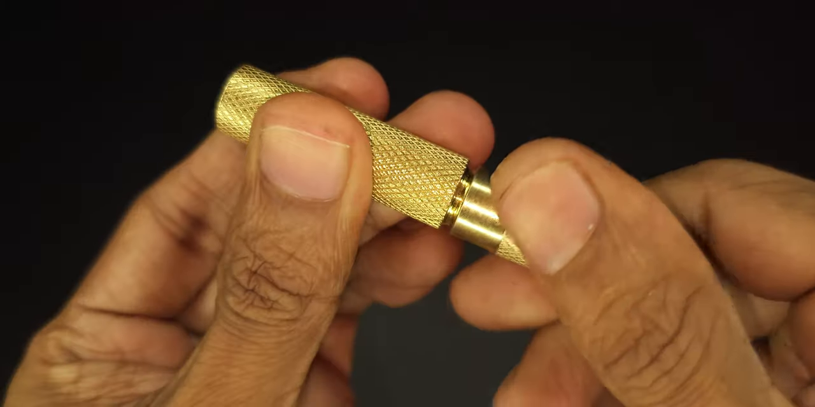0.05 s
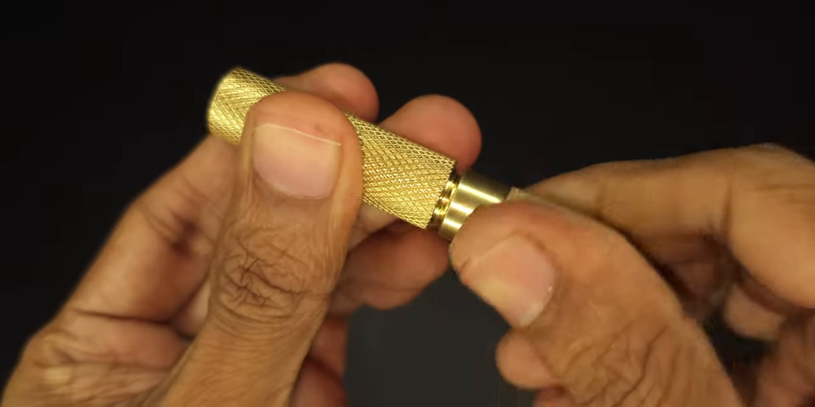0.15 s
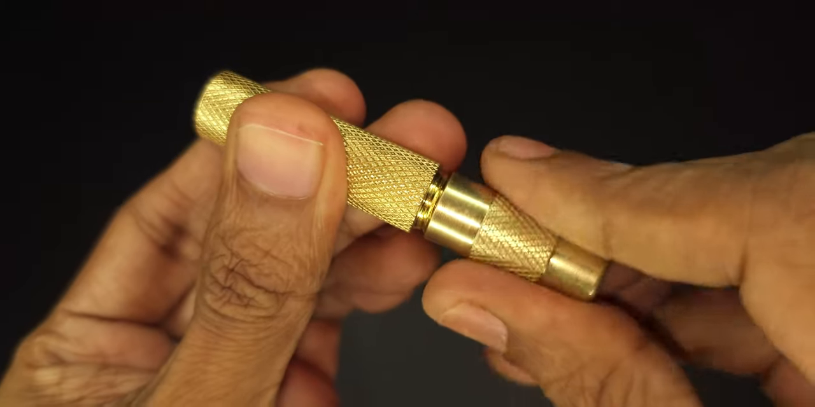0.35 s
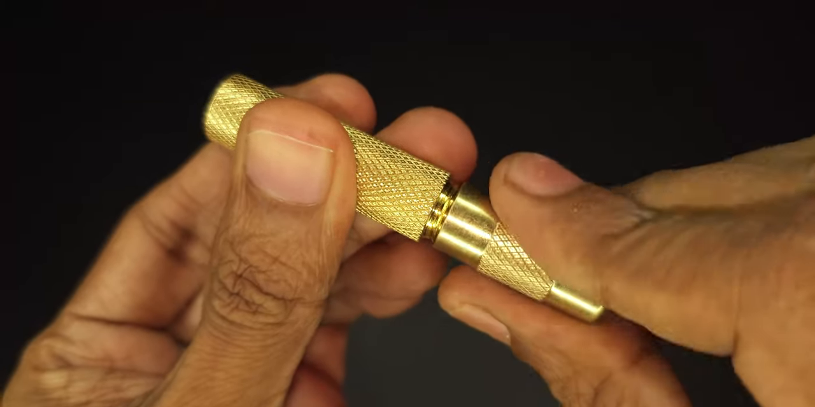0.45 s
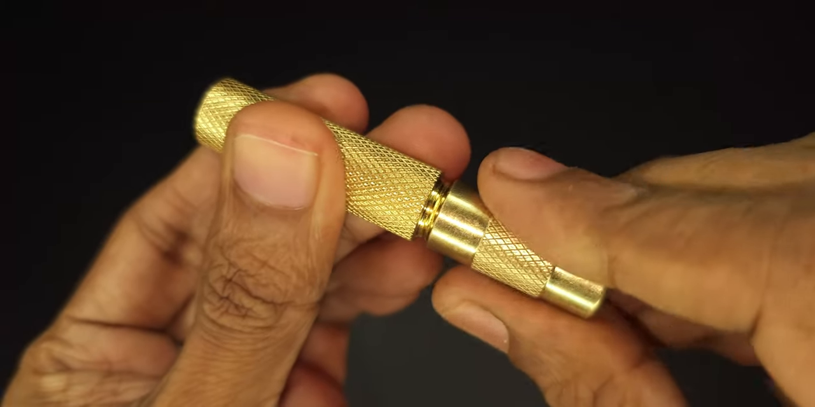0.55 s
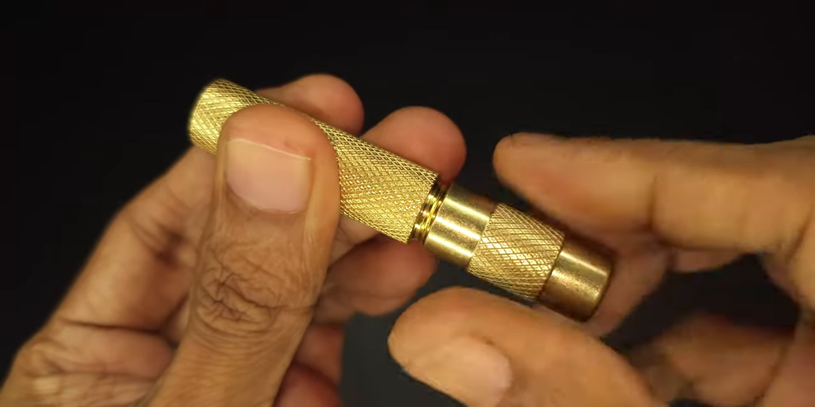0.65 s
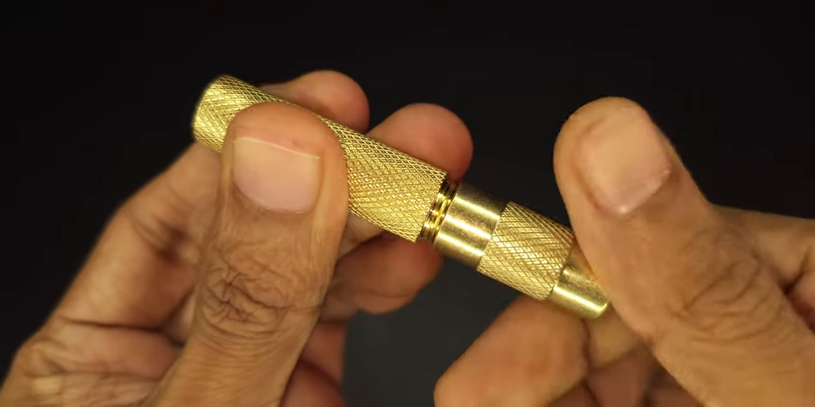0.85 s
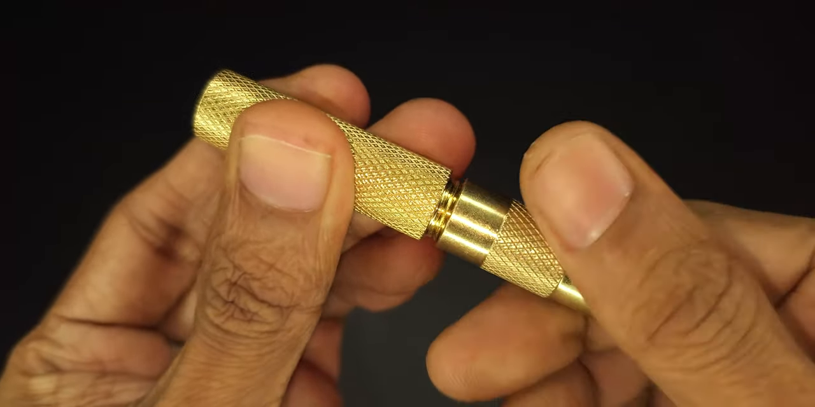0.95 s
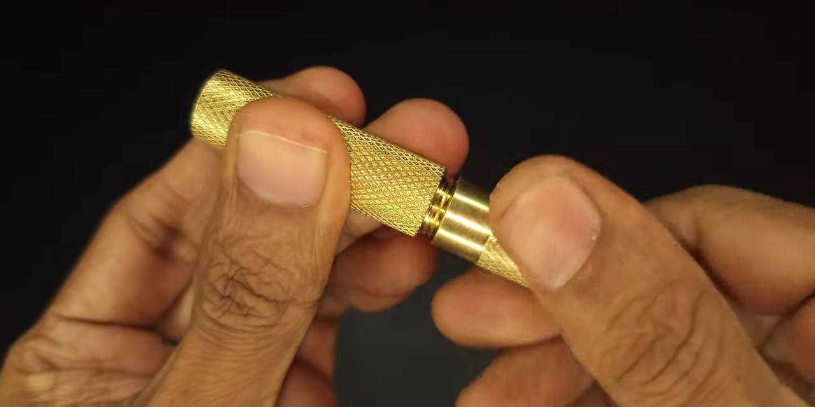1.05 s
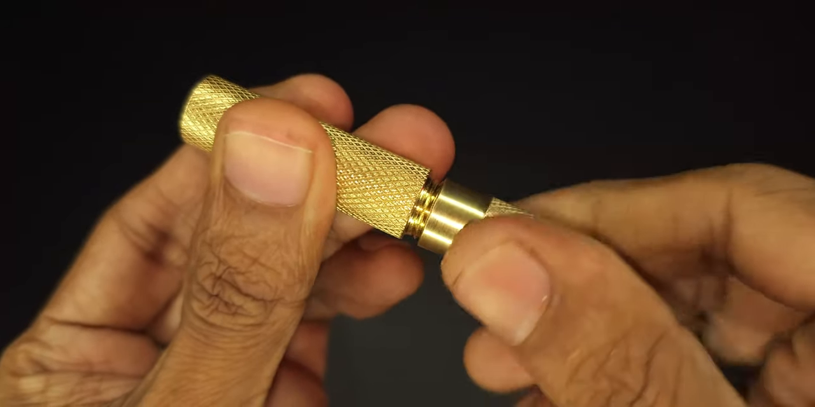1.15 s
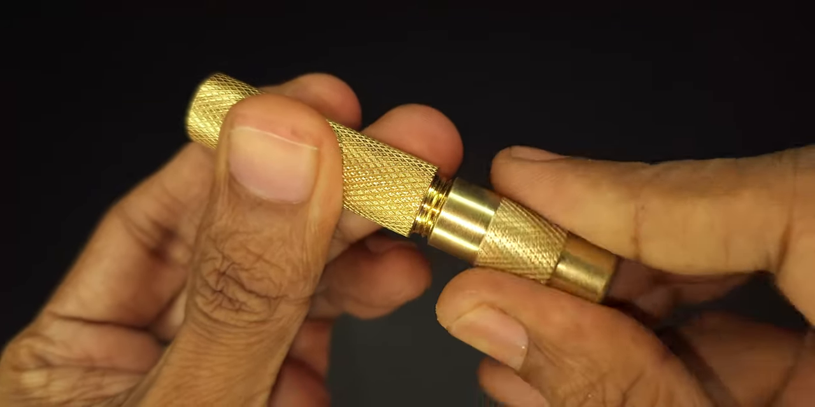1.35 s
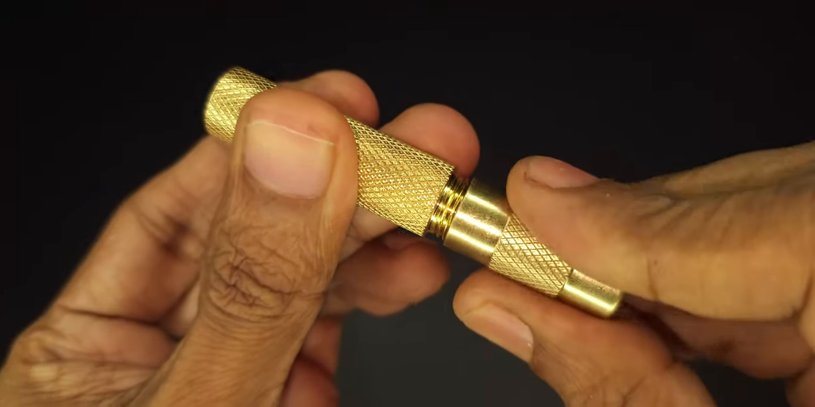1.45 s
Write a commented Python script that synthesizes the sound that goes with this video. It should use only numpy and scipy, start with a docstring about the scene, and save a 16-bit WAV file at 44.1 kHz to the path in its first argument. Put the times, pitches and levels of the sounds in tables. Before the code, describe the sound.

Close to the microphone in a quiet room, a small brass tool's loose thread catches and slips in light, irregular clicks as it is unscrewed. Two short runs, with soft rubbing and faint finger knocks, are separated by a pause.

```python
"""Short gritty clicks, close by in a quiet room: fingers unscrew the knurled brass collar of a hand tool.
In two twists, with a pause to regrip, the loose thread catches and slips; each slip is a burst of tiny
impacts. Sliding friction rubs softly between the clicks, and stick-slip squeaks where brass grips brass.
These contacts excite the hand-damped modes of the tool, and the fingers knock softly on its barrel.
A short reverberation follows, over faint rumble, hiss and hum."""
import sys
import numpy as np
from scipy import signal
from scipy.fft import rfft, irfft
from scipy.io import wavfile
from scipy.ndimage import uniform_filter1d

SR = 44100
rng = np.random.default_rng(int(sys.argv[2]) if len(sys.argv) > 2 else 0)


def generate_wav(sig):
    """Save sig (samples, or channels by samples) to the path in sys.argv[1] as 16-bit PCM at SR."""
    pcm = np.round(np.clip(np.atleast_2d(sig).T, -1, 1) * 32767).astype(np.int16)
    wavfile.write(sys.argv[1], SR, pcm)


N = 66150
FFT_SIZE = 2 ** 17
TIME = np.arange(N) / SR
FREQS = np.arange(FFT_SIZE // 2 + 1) * SR / FFT_SIZE


def clicks():
    """Impact excitation: each slip is a fast-decaying burst of grit with its own broad resonance."""
    # slips of the thread: t/s, relative bass, middle and treble level/dB, decay time constant/s,
    # resonance f/Hz, left-right/dB
    slips = [ (.0211, -44, -41, -41, .006, 5400, 6), (.052, -50, -44, -51, .005, 3900, 8),
             (.0957, -53, -48, -52, .007, 4100, 4), (.1037, -49, -50, -46, .0035, 4000, 6),
             (.1402, -46, -36, -39, .0075, 7600, 5), (.1728, -55, -49, -58, .005, 3700, 10),
             (.2244, -37, -32, -30, .002, 5450, 5), (.2291, -53, -33, -27, .003, 5700, 5),
             (.2874, -53, -45, -45, .006, 5500, 5), (.2995, -41, -33, -37, .007, 7500, 5),
             (.3361, -47, -35, -36, .004, 6550, 13), (.3525, -39, -34, -34, .004, 5400, 8),
             (.3785, -50, -50, -49, .005, 5280, 10), (.4208, -42, -40, -39, .0045, 3700, 9),
             (.6247, -68, -61, -58, .0037, 4800, 7), (.9952, -47.5, -45.5, -46.5, .0055, 8100, 9),
             (1.0397, -53, -45.5, -42, .0035, 3700, 4), (1.0574, -54, -53, -57, .005, 8250, 7),
             (1.0995, -46, -39, -38.5, .003, 3730, 7), (1.1168, -42, -35, -32.5, .003, 8700, 7),
             (1.1523, -50, -39, -44, .0045, 4050, 7), (1.1629, -61, -58, -46, .0044, 5500, 0),
             (1.1802, -55, -54, -49, .003, 4040, 7), (1.2212, -48, -41, -33, .003, 8550, 7),
             (1.2515, -46, -41, -38, .0058, 7100, 7), (1.2883, -53, -47, -45, .005, 6900, 8),
             (1.2922, -42, -36, -34, .004, 6900, 7), (1.3289, -49, -34.5, -37, .003, 6900, 7),
             (1.3445, -52, -46, -44, .005, 6570, 10), (1.3536, -51, -44, -50, .007, 6350, 9),
             (1.3753, -45, -38, -35, .004, 7750, 7), (1.4095, -47, -42, -42, .0045, 5300, 8),
             (1.4139, -55, -40, -39, .0026, 5250, 8), (1.4492, -46, -38, -33, .004, 4630, 6)]
    rise_s, hold_s = .0012, .0014
    bass_edge_hz, treble_edge_hz, band_trim_db = 2800, 8000, np.array([1, -4, 1])
    ping_db, ping_width_hz = -3, 450
    bass = 1 / np.sqrt(1 + (FREQS / bass_edge_hz) ** 12)
    treble = np.sqrt(1 - 1 / (1 + (FREQS / treble_edge_hz) ** 12))
    middle = np.sqrt(np.maximum(1 - bass ** 2 - treble ** 2, 0))
    forces, pings, grains = np.zeros((3, 2, N)), np.zeros((2, N)), grit()
    radius = np.exp(-np.pi * ping_width_hz / SR)
    for t, bass_db, middle_db, treble_db, decay_s, hz, pan_db in slips:
        span = slice(int(t * SR), int(t * SR) + SR // 10)
        age = TIME[span] - TIME[span][0]
        decay = np.exp(-np.maximum(age - hold_s, 0) / decay_s)
        burst = pan(pan_db) * np.minimum(age / rise_s, 1) * decay
        band_gains = from_db(band_trim_db + [bass_db, middle_db, treble_db])
        forces[:, :, span] += band_gains[:, None, None] * burst
        drive = from_db(middle_db + ping_db) * np.sqrt((1 - radius ** 2) / 2) * burst * grains[:, span]
        pings[:, span] += resonator(drive, hz, radius)
    colour, bands = contact_colour(), (bass, middle, treble)
    return pings + sum(shape(force * grit(), colour * band) for force, band in zip(forces, bands))


def grit():
    """Shot noise: dense tiny impacts of uneven size but steady power, heard slightly later on the right."""
    # likeness of the two sides: f/Hz, correlation
    likeness = [(100, 0.63), (600, .75), (1500, 0.563), (5000, 0.69), (15000, 0.13)]
    impacts_per_s, size_spread_db, levelling_s, right_lag_s = 6800, 1, .0015, .00014
    sizes = from_db(size_spread_db * np.minimum(rng.exponential(1, (2, N)), 4))
    signs = rng.choice([-1, 1], (2, N))
    grains = sizes * signs * (rng.random((2, N)) < impacts_per_s / SR)
    grains /= np.sqrt(uniform_filter1d(grains ** 2, size=int(levelling_s * SR)) + 1e-2)
    stereo = spread(grains, at_hz(likeness, FREQS))
    delay = np.exp(-2j * np.pi * FREQS * np.array([[0], [right_lag_s]]))
    return rms_one(filtered(stereo, delay))


def contact_colour():
    """Frequency response of brass on brass, as radiated to left and right."""
    # contact spectrum: f/Hz, relative spectral level/dB
    spectrum = [(88, -27), (150, -14), (854, -8.5), (1100, -11), (1310, -2), (1830, -4.5), (2020, 0.5),
                (2650, -8.5), (3220, -1.5), (3770, 3), (4320, -1.5), (5360, 3.5), (5910, -6), (6640, -1),
                (10600, -6), (11500, 0.5), (12400, -10), (15100, 2.5), (16000, -10.5)]
    # balance of the tool's sound: f/Hz, left-right/dB
    balance = [(100, 2), (450, 1), (1200, -0.5), (3300, -0.5), (5500, 12.5), (9000, 0), (15000, -6)]
    return from_db(at_hz(spectrum, FREQS)) * pan(at_hz(balance, FREQS)) * low_cut(hz=90)


def squeaks():
    """Stick-slip oscillation: brief tones of three harmonics with a gliding, unsteady pitch."""
    # squeaks: peak t/s, rise/s, fall/s, first f/Hz, last f/Hz, level/dB,
    # relative level/dB of the second and third harmonics
    tones = [(0.228, .0015, 0.004, 5390, 5400, -22.5, -3.5, -33),
             (.2311, 0.000518, 0.0016, 5530, 5387, -12, -0.5, -7),
             (.3379, 0.0012, 0.0011, 6870, 6550, -19, -31, -34),
             (0.3421, .002, 0.0019, 5265, 5350, -25.5, -19, -7),
             (1.333, 0.001, 0.0058, 6850, 6800, -37, -10, -48),
             (1.349, 0.0022, .007, 7300, 6140, -34, -26, -42.5)]
    # balance of each harmonic: left-right/dB
    balance = [12, -2.5, 8.5]
    wander_share, flutter_db, wander_hz = .074, 1.66, 1479
    side_phase = np.array([[0], [np.pi / 2]])
    out = np.zeros((2, N))
    for t, rise_s, fall_s, first_hz, last_hz, db, second_db, third_db in tones:
        age = TIME - t
        swell = np.exp(-np.minimum(np.where(age < 0, (age / rise_s) ** 2, age / fall_s), 20))
        glide = np.interp(age, [-rise_s, fall_s], [first_hz, last_hz])
        hz = glide * (1 + wander_share * drift(wander_hz))
        phase = 2 * np.pi * np.cumsum(hz) / SR
        offsets = rng.uniform(0, 2 * np.pi, 3)
        for k, harmonic_db in enumerate((0, second_db, third_db)):
            gain = from_db(db + harmonic_db + flutter_db * drift(wander_hz)) * pan(balance[k])
            out += gain * swell * np.sin((k + 1) * phase + offsets[k] + side_phase)
    return out


def rubbing():
    """Sliding friction: the turning thread grinds softly, fluttering under uneven pressure."""
    # course of the friction noise: t/s, level/dB
    course = [(0, -72), (.04, -58), (.12, -62.5), (.2, -53), (.29, -54.5), (.37, -51), (.41, -61.5),
              (.45, -58), (.49, -78.5), (.96, -75), (1.01, -67.5), (1.09, -62.5), (1.15, -52), (1.2, -62.5),
              (1.28, -56.5), (1.35, -48.5), (1.43, -59), (1.5, -70)]
    flutter_db = 1.5
    level_db = np.interp(TIME, *np.transpose(course)) + flutter_db * drift(hz=121)
    return shape(grit() * from_db(level_db) * pan(db=-2), contact_colour())


def tool_ring(contacts):
    """Modal resonance: the brass body rings briefly; the shifting grip favours one mode, then another."""
    # hand-damped modes: f/Hz, drive level/dB, T60/s
    tool_modes = [(1328, -55, 0.055), (2048, -54, 0.046), (3664, -40, 0.078), (3990, -41, 0.059),
                  (4350, -39, .06), (4677, -44.5, .06), (5420, -44.5, 0.021), (5950, -45.5, .04),
                  (6310, -41, 0.029), (10360, -45, 0.044), (11380, -45, .04)]
    swing_db, grip_change_hz = 4, 26.8
    out = 0
    for hz, db, t60 in tool_modes:
        drive = contacts * from_db(db + swing_db * drift(grip_change_hz))
        out = out + .5 * resonator(drive, hz, radius=from_db(-60 / (t60 * SR)))
    return out


def finger_bumps():
    """Damped oscillation: fingers knock on the barrel and quickly absorb its soft, hollow note."""
    # knocks: t/s, f/Hz, peak level/dB
    knocks = [(.070, 625, -54), (.174, 444, -52), (0.179, 126, -53), (.229, 87, -54), (.368, 87, -62),
              (.381, 653, -54.5), (.424, 224, -54.5), (.996, 80, -57), (1.058, 590, -54), (1.123, 673, -53),
              (1.182, 500, -60.5), (1.222, 500, -54), (1.256, 477, -52), (1.294, 476, -52.5),
              (1.378, 273, -55.5)]
    rise_s = .0019
    out = np.zeros(N)
    for t, hz, db in knocks:
        age = np.maximum(TIME - t, 0)
        scaled_age = np.minimum(age / rise_s, 40)
        swell = np.sqrt(scaled_age) * np.exp((1 - scaled_age) / 2)
        out += from_db(db) * swell * np.sin(2 * np.pi * hz * age)
    return out * pan(db=9)


def reverberation(direct):
    """Diffuse reflection: a short, exponentially decaying tail, different on each side."""
    t60_s, tail_db, delay_s, crossfeed = .19, -13, .0017, .23
    tail = rng.standard_normal((2, N)) * from_db(-60 * TIME / t60_s) * (TIME > delay_s)
    tail /= np.sqrt(np.sum(tail ** 2, axis=1, keepdims=True))
    return from_db(tail_db) * signal.fftconvolve(direct + crossfeed * direct[::-1], tail, axes=1)[:, :N]


def room_tone():
    """Stationary noise: broadband rumble and hiss, with narrow bands heard as faint tones."""
    # rumble and hiss: f/Hz, relative spectral level/dB
    spectrum = [(15, -19), (25, -0.5), (82, -5), (120, -6.5), (206, -8), (277, -7.5), (301, -18),
                (335, -18), (384, -24.5), (427, -14.5), (531, -17.5), (911, -23), (988, -26.5),
                (1940, -27.5), (2220, -25.5), (3620, -26), (11600, -31), (13200, -30.5), (16000, -17.5)]
    # narrow bands: f/Hz, level/dB, half-width/Hz
    hum_bands = [(84, -83, 11), (222, -80.5, 10), (322, -81.5, 4.8), (15730, -79, 170)]
    air_db, correlation = -63, .4
    air_gain = from_db(at_hz(spectrum, FREQS)) * low_cut(hz=35)
    air = from_db(air_db) * shape(spread(rng.standard_normal((2, N)), correlation), air_gain)
    hum_gain = sum(from_db(db) * rms_one(1 / (1 + ((FREQS - hz) / half_width_hz) ** 2))
                   for hz, db, half_width_hz in hum_bands)
    hum = filtered(spread(rng.standard_normal((2, N)), correlation), hum_gain)
    return (air + hum) * pan(db=3)


def from_db(db):
    """Amplitude ratio of a level in decibels."""
    return 10 ** (np.asarray(db) / 20)


def rms_one(x):
    """Normalisation to unit power."""
    return x / np.sqrt(np.mean(x ** 2) + 1e-20)


def at_hz(points, hz):
    """Interpolation on a logarithmic frequency axis."""
    freqs, values = np.transpose(points)
    return np.interp(np.log(np.maximum(hz, 1)), np.log(freqs), values)


def pan(db):
    """Constant-power gains for a left-right level difference."""
    gains = from_db(np.array([[.5], [-.5]]) * db)
    return gains / np.sqrt(np.mean(gains ** 2, axis=0))


def drift(hz):
    """Random modulation: low-pass noise of unit power."""
    return rms_one(signal.sosfilt(signal.butter(2, hz, fs=SR, output="sos"), rng.standard_normal(N)))


def low_cut(hz):
    """Gain of a first-order high-pass filter."""
    return FREQS / np.hypot(FREQS, hz)


def resonator(drive, hz, radius):
    """Two-pole resonance whose ringing shrinks by the factor radius each sample."""
    feedback = [1, -2 * radius * np.cos(2 * np.pi * hz / SR), radius ** 2]
    return signal.lfilter([1, 0, -1], feedback, drive + 1e-18)


def filtered(x, response):
    """Convolution as a product of spectra."""
    return irfft(rfft(x, FFT_SIZE) * response)[..., :N]


def shape(x, gain):
    """Minimum-phase filtering that keeps the power of white noise."""
    cepstrum = irfft(np.log(rms_one(gain) + 1e-6))
    cepstrum[..., 1:FFT_SIZE // 2] *= 2
    cepstrum[..., FFT_SIZE // 2 + 1:] = 0
    return filtered(x, np.exp(rfft(cepstrum)))


def spread(pair, correlation):
    """Mid-side mixing: two independent signals become partly correlated left and right."""
    first, second = rfft(pair, FFT_SIZE)
    mid = first * np.sqrt((1 + correlation) / 2)
    side = second * np.sqrt((1 - correlation) / 2)
    return irfft(np.array([mid + side, mid - side]))[:, :N]


def scene():
    """Superposition: the contacts, the ringing they excite and the knocks all sound in the room."""
    contacts = clicks() + rubbing() + squeaks()
    tool = contacts + tool_ring(contacts) + finger_bumps()
    return tool + reverberation(tool) + room_tone()


def record(dry):
    """Band limiting: a steep low-pass removes the highest treble."""
    cutoff_hz = 16000
    return filtered(dry, 1 / np.sqrt(1 + (FREQS / cutoff_hz) ** 240))


dry = scene()
out = record(dry)
generate_wav(out)
```